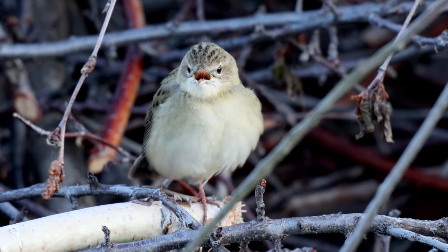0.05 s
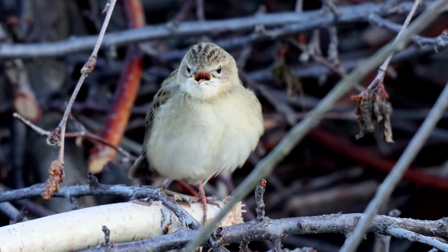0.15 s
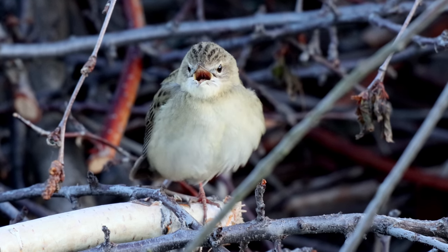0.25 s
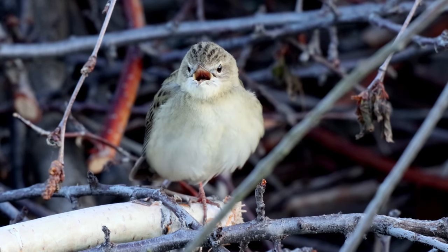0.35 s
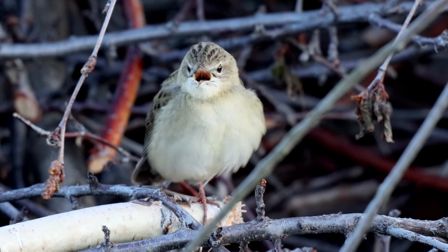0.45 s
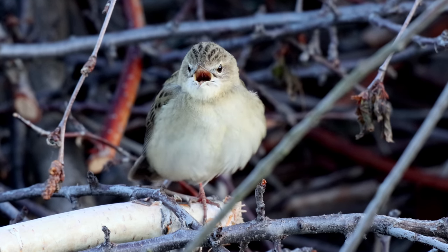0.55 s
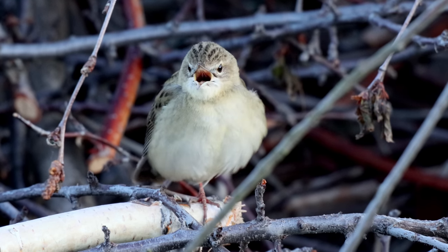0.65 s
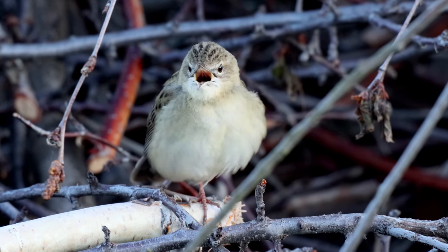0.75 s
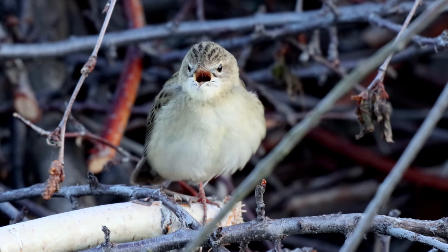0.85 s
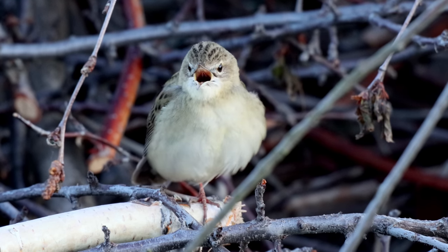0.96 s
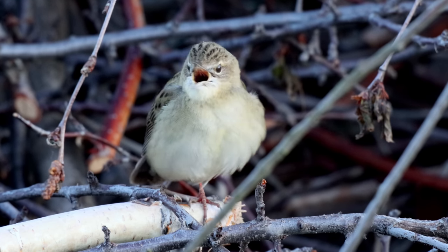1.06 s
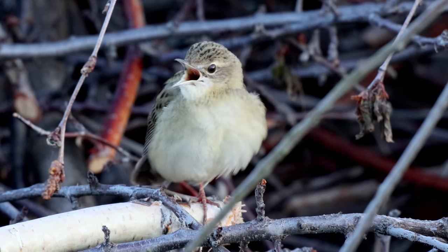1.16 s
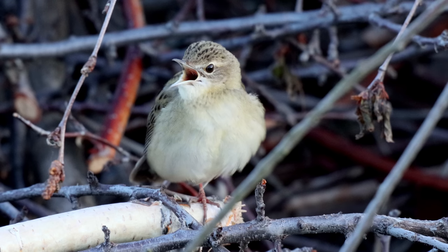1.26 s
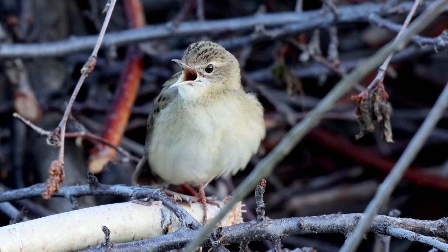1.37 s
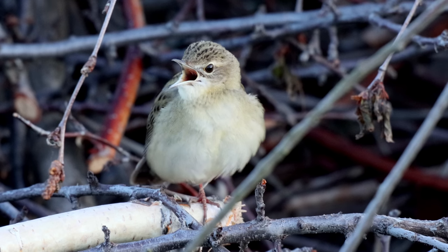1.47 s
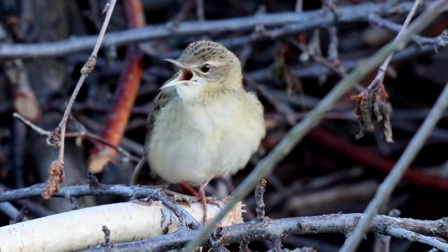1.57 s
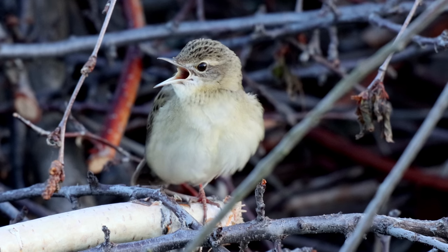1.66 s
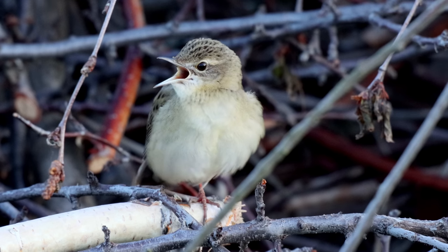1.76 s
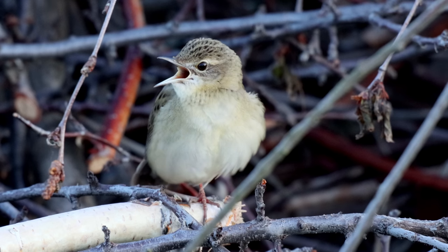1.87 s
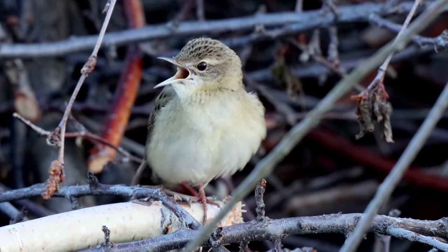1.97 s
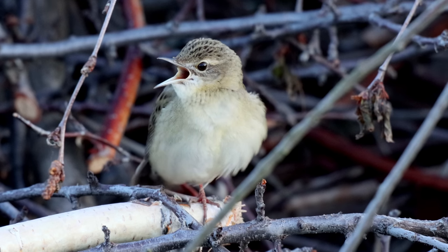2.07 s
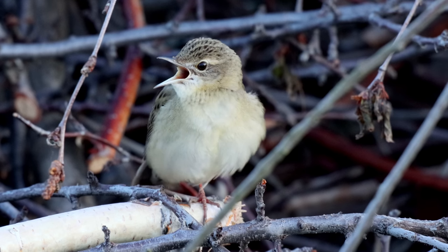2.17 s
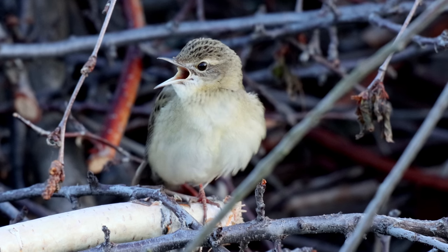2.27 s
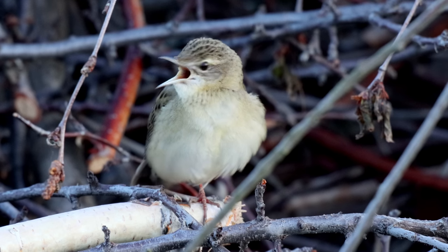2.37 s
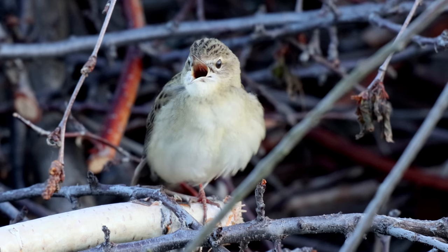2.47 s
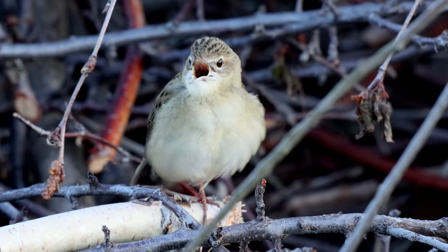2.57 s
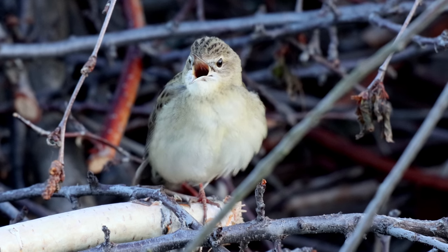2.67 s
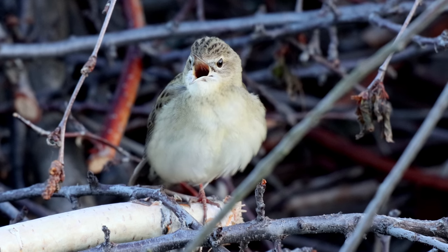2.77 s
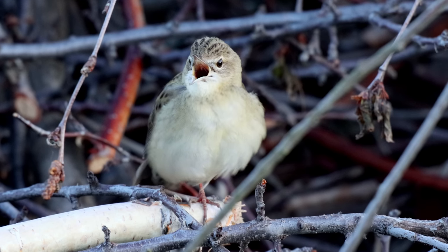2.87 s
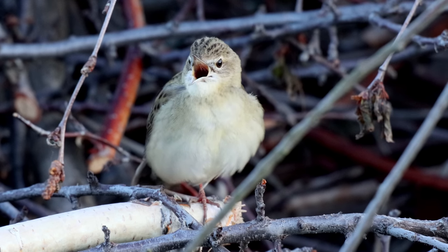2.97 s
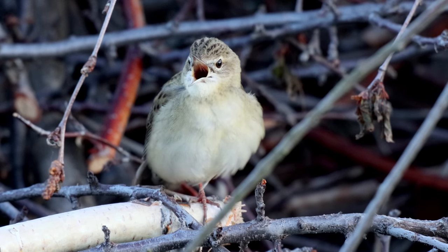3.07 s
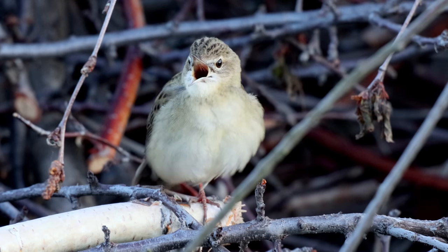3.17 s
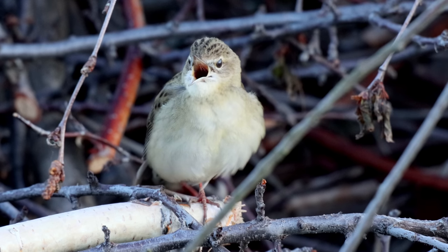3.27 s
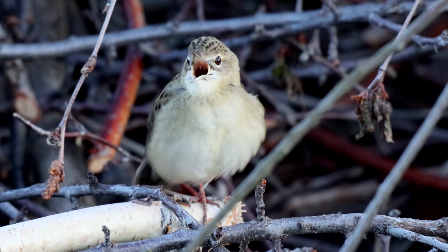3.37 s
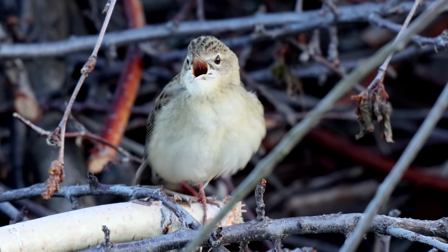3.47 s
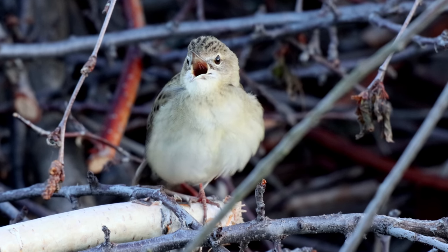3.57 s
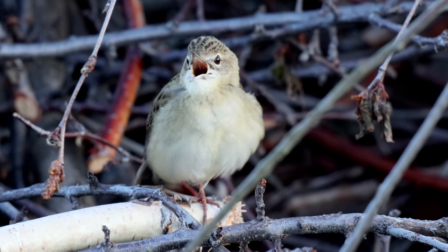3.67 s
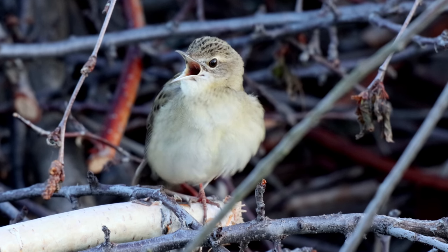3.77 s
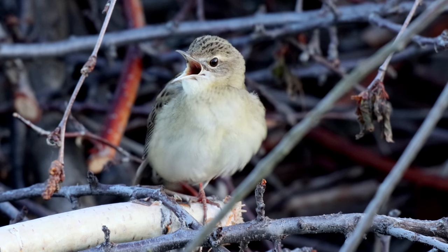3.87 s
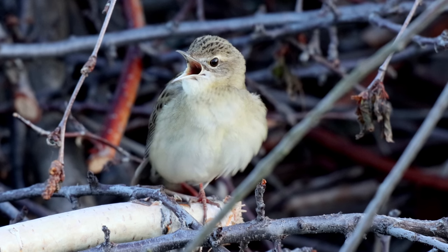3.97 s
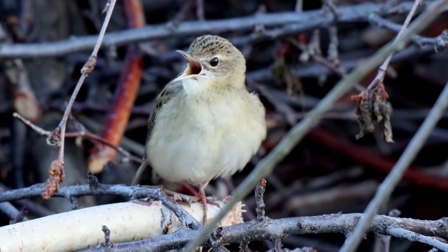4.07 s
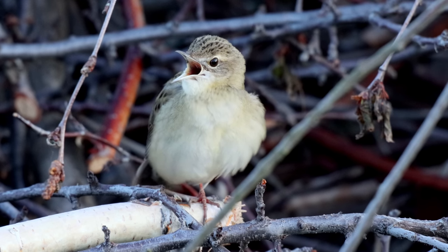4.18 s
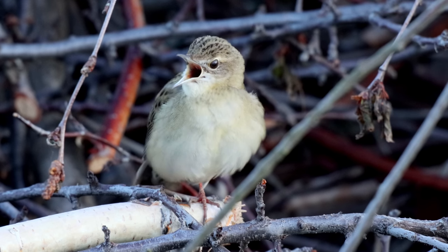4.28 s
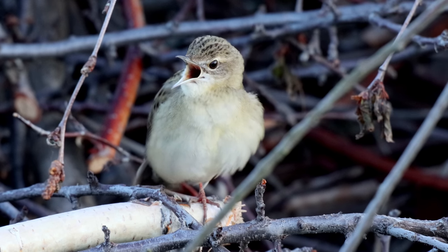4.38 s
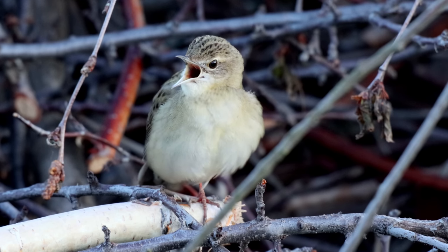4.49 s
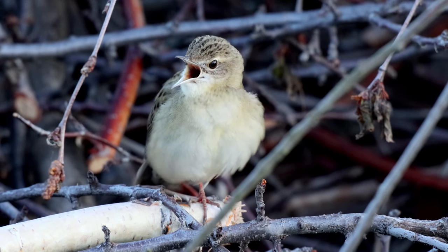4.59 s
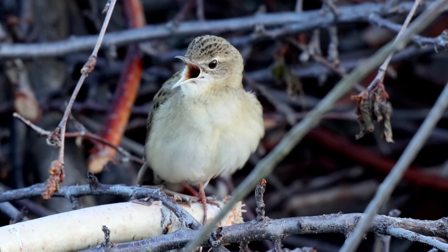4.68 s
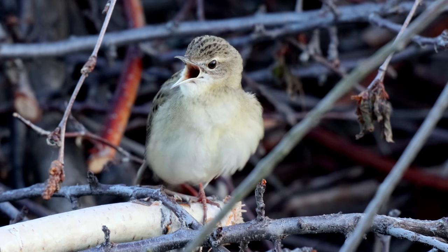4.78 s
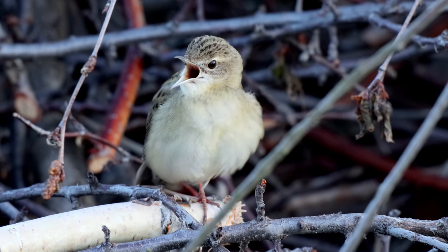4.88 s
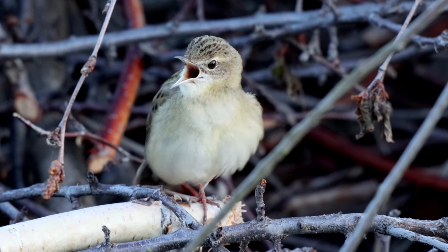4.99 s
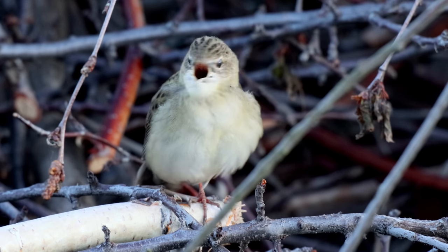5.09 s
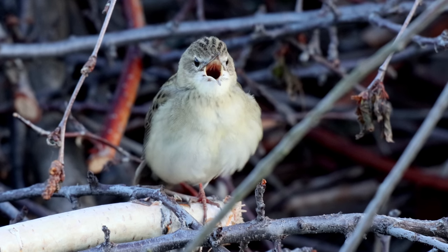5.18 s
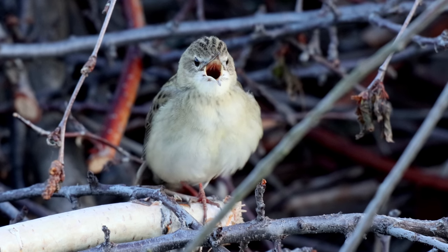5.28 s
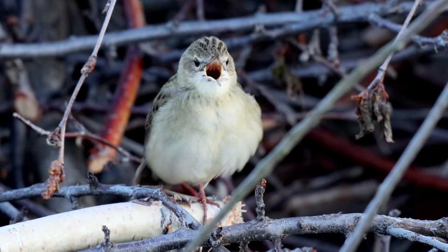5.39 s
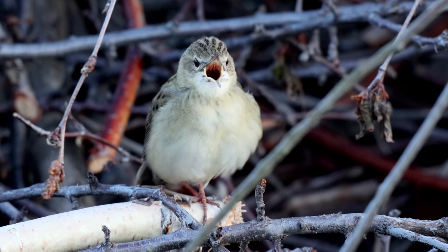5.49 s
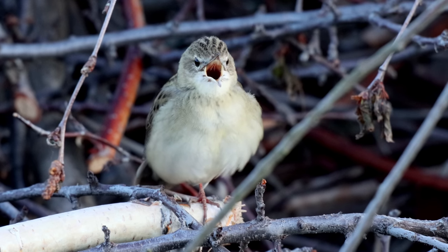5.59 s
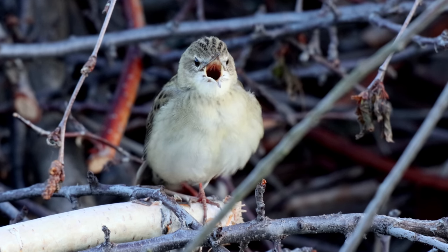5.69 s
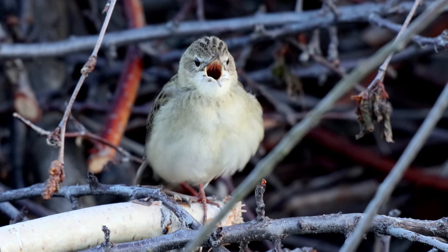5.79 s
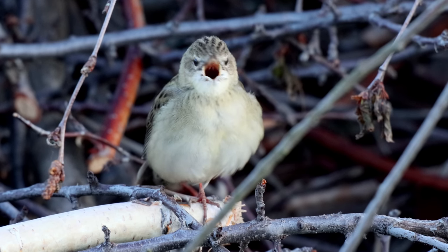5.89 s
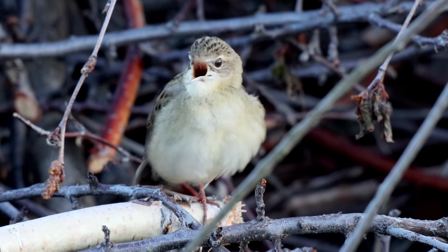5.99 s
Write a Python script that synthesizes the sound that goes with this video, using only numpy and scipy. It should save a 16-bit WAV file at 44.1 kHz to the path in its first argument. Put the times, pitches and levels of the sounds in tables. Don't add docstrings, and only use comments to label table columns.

```python
import sys
import numpy as np
from scipy import signal
from scipy.fft import rfft, irfft
from scipy.io import wavfile
from scipy.ndimage import uniform_filter1d

SR = 44100
rng = np.random.default_rng(int(sys.argv[2]) if len(sys.argv) > 2 else 0)


def linear_from_db(decibels):
    return 10 ** (np.asarray(decibels, float) / 20)


def bounce(signal):
    frames = np.transpose(np.atleast_2d(signal))
    limited = np.clip(frames, -1, 1)
    pcm = np.round(limited * 32767).astype(np.int16)
    wavfile.write(sys.argv[1], SR, pcm)


N = 266275

# (frequency [Hz], level per Hz [dB], likeness of the two sides [0-1])
AIR = [(25, -22.5, .8), (41.2, -19, 0.93), (58.4, 1, 0.99), (77.6, -4.5, 0.69), (146, -4.5, 0.13),
       (271, -5, 0.4), (443, -10, 0.25), (1400, -15, 0.71), (2420, -18.5, 0.38), (4290, -15.5, 0),
       (9930, -22.5, 0), (14900, -21.5, 0), (16460, -43.5, .2)]
AIR_DB = -44.5
# (time [s], level [dB], low hum against it [dB])
ROAD = [(0, -41, -11.5), (.5, -40.5, -7), (1.5, -40.5, -7.5), (2.3, -40.5, -8.5), (2.8, -41, -4),
        (3.3, -37.5, -6.5), (3.8, -42, -3.5), (4.4, -42.5, -7), (6.04, -42, -5)]
# (frequency [Hz], level [dB])
ROAD_COLOUR = [(300, -23), (600, -16), (760, -6), (850, 0.5), (1030, 2.5), (1150, -2), (1230, -8.5),
               (1300, -31.5), (1600, -48)]
# (time [s], peak level [dB], pitch [Hz])
KNOCKS = [
    (1.541, -38, 266.5),
    (1.701, -40, 274.5),
    (1.923, -32.5, 260.6),
    (2.526, -38.5, 253),
    (2.735, -36, 274.7),
    (2.824, -41, 248.7),
    (3.82, -39.5, 269.6),
]
# (time [s], length [s], start pitch [Hz], end pitch [Hz], level [dB])
FAR_BIRDS = [(0.156, 0.0144, 3100, 3196, -55.5), (0.21, 0.017, 3900, 3860, -54),
             (.285, .012, 3800, 3590, -62), (0.308, 0.0098, 3450, 3470, -47), (0.9, 0.042, 2200, 2686, -54),
             (1.084, 0.088, 1380, 1440, -60), (1.129, 0.0253, 1950, 2395, -53),
             (1.354, 0.0234, 1950, 1982, -52.5), (1.382, 0.033, 2195, 2760, -52),
             (1.504, 0.0404, 3300, 3594, -54), (1.584, 0.067, 1380, 1400, -61),
             (1.838, 0.0387, 1940, 2585, -49), (1.859, 0.0425, 2600, 2712, -50.5),
             (2.013, 0.082, 1330, 1333, -58.5), (2.485, 0.028, 4150, 3180, -49),
             (2.607, 0.026, 4000, 3100, -48.5), (2.684, 0.0236, 3700, 3370, -49),
             (2.994, 0.0187, 3950, 3290, -49), (3.122, .04, 2900, 3500, -50.5),
             (4.76, 0.058, 2190, 2213, -58), (5.05, .08, 2195, 2176, -62.5), (5.39, 0.074, 2190, 2204, -60),
             (5.61, 0.048, 2190, 2190, -68.5)]

# (beat number, time of its whistle [s])
PACE = [(0, 0.0272), (2, 0.1068), (5, 0.2217), (7, 0.3011), (26, 1.041), (27, 1.0812), (29, 1.1564),
        (45, 1.7847), (51, 2.0221), (53, 2.0987), (73, 2.8896), (76, 3.0065), (84, 3.3259), (108, 4.2805),
        (120, 4.7655), (124, 4.925), (147, 5.8478), (151, 6.0058)]
# (time [s], whistle peak level [dB], early pitch [Hz])
EFFORT = [(0.03, -39.5, 6060), (0.26, -27, 6585), (0.53, -24.5, 6650), (0.65, -25, 6560),
          (0.69, -21.5, 6812), (1.12, -20.5, 6633), (1.2, -16.5, 6644), (1.59, -15.5, 6715),
          (2.02, -12, 6590), (2.1, -12, 6840), (2.41, -10.5, 6508), (2.53, -10.5, 6734), (3.68, -8, 6723),
          (4.2, -8, 6465), (4.28, -7.5, 6806), (5.25, -7, 6650), (5.29, -7, 6818), (6.01, -6, 6680)]
# (time [s], level change [dB], pitch change [Hz])
ACCENTS = [(0.03, 3.96, 85.5), (0.07, -7.5, 145), (0.14, 4.5, 90), (0.92, 2.53, 126), (0.96, -0.95, -128),
           (1.08, -3.5, -267), (1.27, -1.55, -175), (1.67, -2.64, -185), (1.71, -2, -47.5),
           (1.98, -7.5, -236), (2.3, -4, -40), (2.61, 3.5, 71), (2.73, -1.72, -156), (2.81, -0.45, -183),
           (3.13, -3, -44), (3.21, -2.2, -69), (3.25, -2.67, -92), (3.56, -3.1, -32.5), (3.64, -5.5, -209),
           (3.76, 1.7, 120), (3.84, -3, 101.5), (4.04, -0.5, 182.5), (4.08, 1.6, 165.5), (4.16, -3, 14.5),
           (4.2, 1.57, 266.5), (4.64, -1.47, -129), (4.85, -2.45, -140), (4.93, 0.25, 138),
           (5.16, 3.5, -80), (5.21, -1.5, -85)]
WHISTLE_SCATTER_DB, WHISTLE_SCATTER_HZ = .8, 40
FALTER_MS_PER_DB = 0.09
WHISTLE_SAG, WHISTLE_FADE, SNAP_DB, SNAP_MS = 0.547, 0.731, -29, 0.3
OCTAVE_DB, OCTAVE_DB_PER_DB = -31, -1.53

# (time from the top [ms], pitch [Hz], fundamental level [dB], octave level [dB])
FLICK = [
    (-1.5, 3100, -53, -46),
    (-1.403, 3480, -26, -11.5),
    (-0.996, 4365, -13, -8),
    (-0.458, 5236, -7, -25.5),
    (0.113, 7647, -2.5, -27.5),
    (0.154, 7330, -1.5, -33),
    (1, 4500, -35.5, -59.5),
]
# (time [s], level [dB])
WARM_UP = [(.1, -50), (.45, -6.5), (.9, 3), (1.3, 5), (2, 5), (6, 1.5)]
# (time [s], level [dB])
FLICK_SHARE = [(.13, 4.5), (.6, -2), (1.3, 1), (2.2, -1.5), (3.3, -.5), (4.3, -1.5), (6, -1.5)]
# (time [s], level change [dB])
SLIPS = [(.25, -4.5), (.29, -25), (.37, -8.5), (.64, -2), (1.03, -3.5), (1.65, -5), (2.72, -3),
         (3.63, -5.5)]
FLICK_LEAD_MS, FIRST_FLICK_S = 14.6, .12
FLICK_SCATTER_DB, FLICK_SCATTER_MS = 1.2, .3
# (time from the top [ms], pitch [Hz], level [dB], octave level [dB], length [ms])
TICK = (-5, 3833, -25, -25, 0.2687)
# (time [s], level [dB])
TICK_SHARE = [(.1, -30), (.5, 9), (1.1, 10), (2, 4.5), (6, 4)]

# (frequency [Hz], width [Hz], level [dB])
THROAT = [(3500, 133, 7), (4000, 203, -13.5), (4955, 528, 4), (5191, 266, -18.5), (5190, 180, -1.5),
          (5890, 123, -13.5), (7311, 430, 7), (8006, 263, 4), (9700, 102, 0.5)]
MOUTH_SHIFT = .3
# (time [s], left minus right [dB])
BEAK = [(0.0, -1.5), (5.82, -2.5), (6.04, -1.5)]
# (left delay [ms], right delay [ms], level [dB])
TWIGS = [(1.9, 1.9, -15), (3.7, 3.7, -16), (5.4, 5.6, -18), (9.3, 9.8, -17)]
THICKET_DB, THICKET_T60_S, FAR_DB, FAR_T60_S = -14, .05, -27, .4
# (frequency [Hz], threshold under the loudest nearby moment [dB])
STARVE = [(1800, -84), (2600, -42.5), (4500, -45), (7000, -66), (9500, -48), (12000, -42.5), (14500, -49),
          (16000, -24.5)]


def curve(table, x):
    return np.interp(x, *np.transpose(table))


def shaped(noise, hz, db):
    f = np.maximum(np.arange(N // 2 + 1) * SR / N, 1)
    return irfft(rfft(noise) * linear_from_db(np.interp(np.log(f), np.log(hz), db)), N)


def level(x, db):
    return x * linear_from_db(db) / np.sqrt(np.mean(x ** 2))


def walk(rate):
    k = int(SR / rate)
    steps = np.repeat(rng.standard_normal(N // k + 1), k)
    return 1.29 * uniform_filter1d(uniform_filter1d(steps, k), k)[:N]


def add(out, s, hz, gain, octave, start):
    phase = start + 2 * np.pi * np.cumsum(hz) / SR
    i = int(s * SR)
    tone = (gain * np.sin(phase) + octave * np.sin(2 * phase + start))[:N - i]
    out[i:i + len(tone)] += tone


def air():
    hz, db, like = np.transpose(AIR)
    like = np.clip(like, 0, .99)
    mid, side = (shaped(rng.standard_normal(N), hz, db + 10 * np.log10(1 + k * like)) for k in (1, -1))
    flutter_db = 0.31 * walk(3.2) + np.array([[-.4], [.4]])
    return level(np.array([mid + side, mid - side]), AIR_DB) * linear_from_db(flutter_db)


def road():
    s, db, low_db = np.transpose(ROAD)
    db, low_db = (np.interp(np.arange(N) / SR, s, c) for c in (db, low_db))
    noise = rng.standard_normal((4, N))
    tyres = level(shaped(noise[0] + 0.193 * noise[1:3], *np.transpose(ROAD_COLOUR)), 0)
    tyres = tyres * linear_from_db(0.94 * walk(9.9))
    hum = shaped(noise[3] + 0.312 * noise[1:3], [324, 557, 732.5, 928], [-30.5, -4, -4, -27])
    hum = level(hum, -4) * linear_from_db(low_db + 1.0 * walk(6.71))
    return linear_from_db(db + np.array([[-2.7], [2.7]])) * (tyres + hum)


def knocks():
    out, t = np.zeros((2, N)), np.arange(int(.06 * SR)) / SR
    for s, db, hz in KNOCKS:
        shape = t / 0.00773 * np.exp(1 - t / 0.00555) * linear_from_db(db + 4.5)
        add(out[0], s, hz + 0 * t, shape * linear_from_db(5.0), 0, 0)
        add(out[1], s + 0.005, 0.801 * hz + 0 * t, shape * linear_from_db(-3.5), 0, 0)
    return out


def far_birds():
    out, t = np.zeros(N), np.arange(int(.15 * SR)) / SR
    for s, length, from_hz, to_hz, db in FAR_BIRDS:
        u = np.arange(0, 1, 1 / (length * SR))
        add(out, s, from_hz + (to_hz - from_hz) * u, linear_from_db(db) * np.sin(np.pi * u) ** .5, 0, 0)
    smear = level(rng.standard_normal((2, len(t))) * linear_from_db(-60 * t / 0.222), 4.5) / np.sqrt(len(t))
    flutter_db = np.array([2.06 + 6 * walk(120), -1.5 + 6 * walk(110)])
    return out * linear_from_db(flutter_db) + signal.fftconvolve(out[None], smear, axes=1)[:, :N]


def thicket(song):
    t, out = np.arange(int(.4 * SR)) / SR, np.zeros((2, N))
    shares = linear_from_db(5.8 * np.array([walk(1.297) for _ in range(4)]))
    shares = shares / np.sqrt(np.sum(shares ** 2, axis=0))
    treble = signal.butter(1, 5000, "high", fs=SR, output="sos")
    near = level(linear_from_db(-60 * t / THICKET_T60_S), 0) * linear_from_db(THICKET_DB)
    far = level(linear_from_db(-60 * t / FAR_T60_S), 0) * linear_from_db(FAR_DB)
    for share in shares:
        both, own = rng.standard_normal(len(t)), rng.standard_normal((2, len(t)))
        echo = (0.6 * both + 1.1 * own) * (near + far) * (t > .0012) / np.sqrt(len(t))
        for (left, right, db), c in zip(TWIGS, rng.standard_normal((len(TWIGS), 2))):
            delay = np.array([left, right]) * SR / 1000 * (1 + .04 * c[0])
            echo[[0, 1], delay.astype(int)] += linear_from_db(db + 1.5 * c[1])
        echo = signal.sosfilt(treble, echo)
        out += signal.fftconvolve((share * song)[None], echo, axes=1)[:, :N]
    return out


def throat(x):
    for hz, width, db in THROAT:
        x = x + (linear_from_db(db) - 1) * signal.lfilter(*signal.iirpeak(hz, hz / width, SR), x)
    return x


def beats():
    number, s = np.transpose(PACE)
    s = np.interp(np.arange(number[-1] + 1), number, s)
    s = np.append(s, 2 * s[-1] - s[-2])
    at, db, hz = np.transpose(EFFORT)
    return s, np.interp(s, at, db), np.interp(s, at, hz)


def at_beats(s, rows):
    rows = np.array(rows)
    out = np.zeros((rows.shape[1] - 1, len(s)))
    out[:, np.abs(s[:, None] - rows[:, 0]).argmin(axis=0)] = rows[:, 1:].T
    return out


def flick_rows():
    s, db, _ = beats()
    c = rng.standard_normal((len(s), 2)).T
    s = s - (FLICK_LEAD_MS + FLICK_SCATTER_MS * c[0]) / 1000
    db = db + curve(FLICK_SHARE, s) + at_beats(s, SLIPS)[0] + FLICK_SCATTER_DB * c[1]
    return np.transpose([s, db])[s > FIRST_FLICK_S]


def whistle_rows():
    s, db, hz = beats()
    c = rng.standard_normal((len(s), 2)).T
    more_db, more_hz = at_beats(s, ACCENTS)
    s = s - FALTER_MS_PER_DB * more_db / 1000
    db = db + more_db + WHISTLE_SCATTER_DB * c[0]
    hz = hz + more_hz + WHISTLE_SCATTER_HZ * c[1]
    return np.transpose([s, db, hz])[:-1]


def flicks():
    out, (ms, hz, one, two) = np.zeros(N), np.transpose(FLICK)
    rows = flick_rows()
    lead, tick_hz, tick_db, tick_two_db, tick_ms = TICK
    for (s, db), c in zip(rows, rng.standard_normal((len(rows), 8))):
        low_db = curve(WARM_UP, s) + 2.6 * c[7]
        t = np.arange(ms[0], ms[-1], 1000 / SR)
        low = low_db * np.clip(-t / 1.84, 0, 1)
        pitch = np.interp(t, ms, hz) * (1 + 0.011 * c[0])
        gain = linear_from_db(db + low + np.interp(t, ms, one))
        octave = linear_from_db(db + low_db + 2.0 * c[1] + np.interp(t, ms, two) - 5)
        add(out, s + ms[0] / 1000, pitch, gain, octave, 9 * c[2])

        t = np.arange(-2 * tick_ms, 3 * tick_ms, 1000 / SR)
        puff = np.exp(-(t / tick_ms) ** 2) * linear_from_db(db + curve(TICK_SHARE, s) + 2.0 * c[3])
        tick_s = s + (lead + t[0] + .15 * c[4]) / 1000
        pitch = tick_hz * (1 + 0.0058 * c[5]) + 0 * t
        add(out, tick_s, pitch, puff * linear_from_db(tick_db), puff * linear_from_db(tick_two_db), 9 * c[6])
    return out


def whistles():
    out, rows = np.zeros(N), whistle_rows()
    for (s, db, hz), c in zip(rows, rng.standard_normal((len(rows), 4))):
        ms = 4.646 + 0.00276 * (hz - 6700) + 0.413 * c[3]
        t = np.arange(-.6, 1.4 * ms, 1000 / SR)
        onset = 1 / (1 + np.exp(-t / 0.104))
        fade = np.exp(-WHISTLE_SAG * t / ms - WHISTLE_FADE * (np.maximum(t, 0) / ms) ** 4.05)
        gain = linear_from_db(db) * onset * fade
        pitch = hz + 130 - (60 + 10 * c[0]) * t - 380 * np.clip(t / ms, 0, 1.4) ** 2.064
        octave_db = np.minimum(OCTAVE_DB + 2.0 * c[1] + OCTAVE_DB_PER_DB * (db + 11), -16)
        add(out, s - .0006, pitch, gain, gain * np.exp(-t / 4.0) * linear_from_db(octave_db), 9 * c[2])
        snap = np.diff(rng.standard_normal(len(t) + 1)) * np.exp(-(t / SNAP_MS) ** 2)
        i = int((s - .0006) * SR)
        out[i:i + len(t)] += linear_from_db(db + SNAP_DB + 3.56 * c[0]) * snap
    return out


def scene():
    background = air() + road() + knocks() + far_birds()
    bare = flicks()
    coloured = np.clip(1 - MOUTH_SHIFT * np.abs(walk(25)), 0, 1)
    song = throat(coloured * bare) + (1 - coloured) * bare + whistles()
    direction = linear_from_db(np.array([[.5], [-.5]]) * curve(BEAK, np.arange(N) / SR))
    return direction * (song + thicket(song)) + background


def camera(x):
    turn = np.array([[1, 1], [1, -1.039]]) / np.sqrt(2)
    f, _, z = signal.stft(turn @ x, SR, "cosine", 256, 128)
    power = np.abs(z[0]) ** 2
    loud = power.sum(axis=0)

    grain_db = np.interp(f, [3000, 6500, 9000], [-17, -27, -14])[:, None]
    grain = uniform_filter1d(power, size=7, axis=0) * linear_from_db(2 * grain_db)
    spray = loud * linear_from_db(2 * -47.)
    noise = rng.standard_normal(z.shape) + 1j * rng.standard_normal(z.shape)
    z = z + noise * np.sqrt(np.abs(grain) + spray) * (f > 2200)[:, None]

    band, pair = np.arange(len(f)) // 4, np.arange(z.shape[2]) // 2
    luck = rng.standard_normal((2, band[-1] + 1, pair[-1] + 1))[:, band][:, :, pair]
    margin_db = curve(STARVE, f)[:, None] + 4.0 * luck + np.array([0, 4])[:, None, None]
    tile = uniform_filter1d(uniform_filter1d(np.abs(z) ** 2, size=4, axis=1), size=2, axis=2)
    tile = tile[:, np.minimum(4 * band + 2, len(f) - 1)]
    tile = tile[:, :, np.minimum(2 * pair + 1, len(pair) - 1)]
    kept = tile > uniform_filter1d(loud, size=15) * linear_from_db(2 * margin_db)
    return turn @ signal.istft(z * kept, SR, "cosine", 256, 128)[1][:, :N]


def low_pass(x):
    return signal.sosfilt(signal.butter(12, 16480, fs=SR, output="sos"), x)


def record(dry):
    roll_off = signal.cheby2(6, 25, 16900, fs=SR, output="sos")
    mix = signal.sosfilt(roll_off, camera(dry))
    return low_pass(mix)


dry = scene()
out = record(dry)
bounce(out)
```